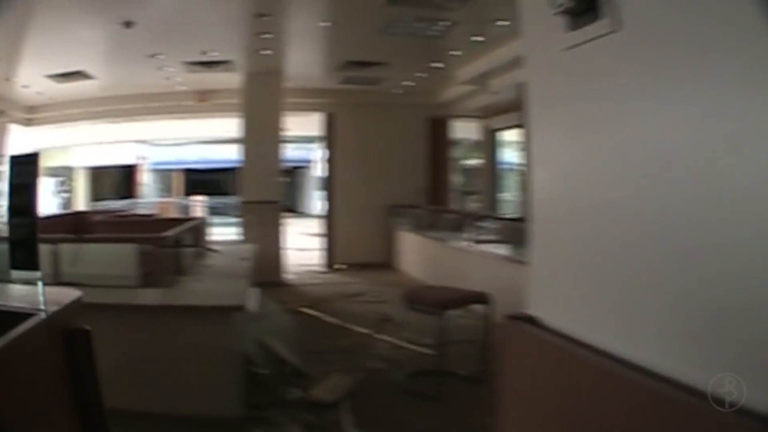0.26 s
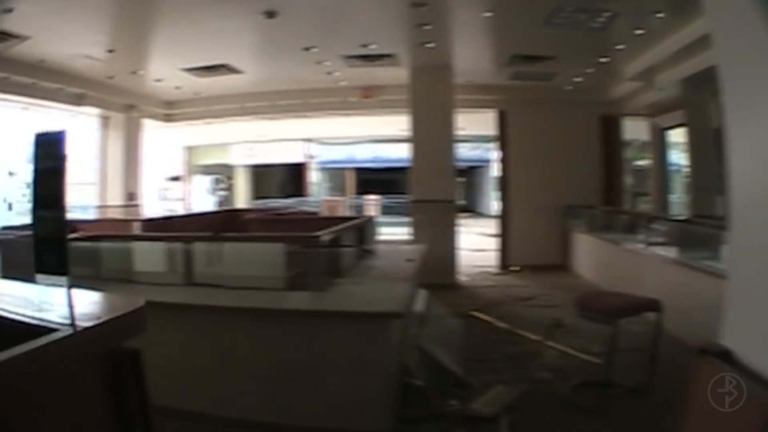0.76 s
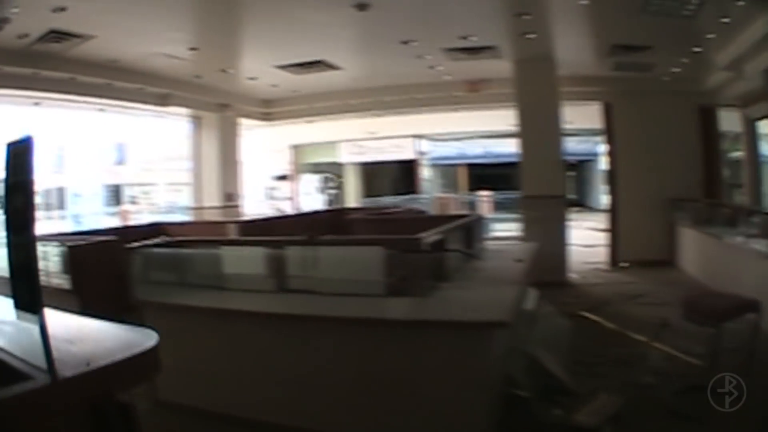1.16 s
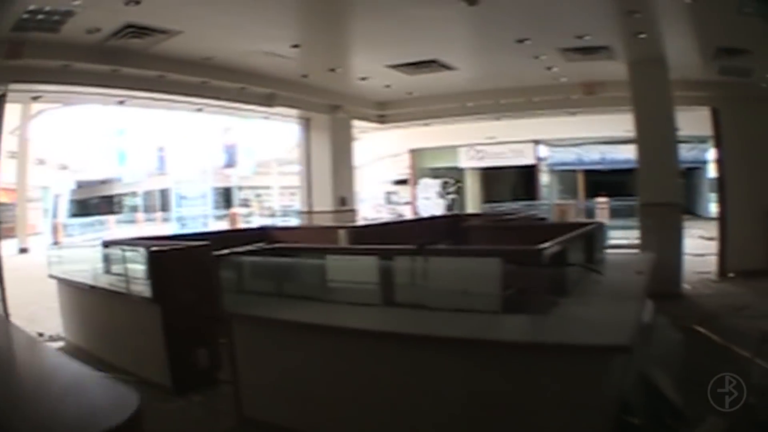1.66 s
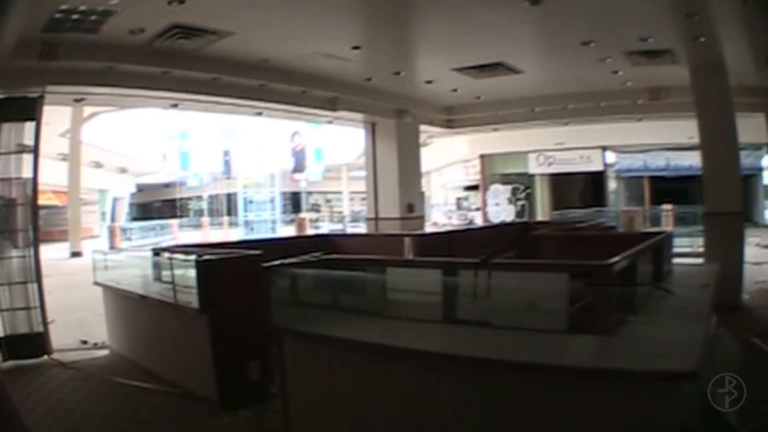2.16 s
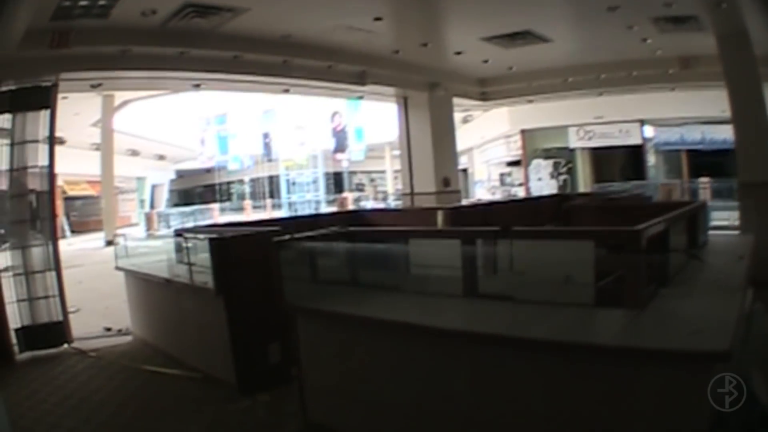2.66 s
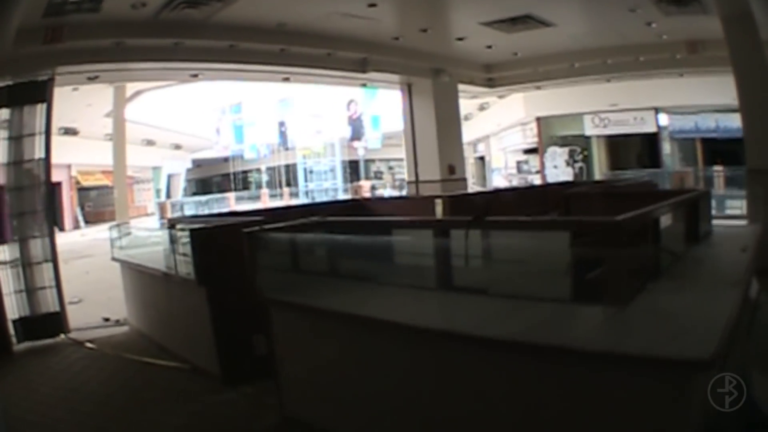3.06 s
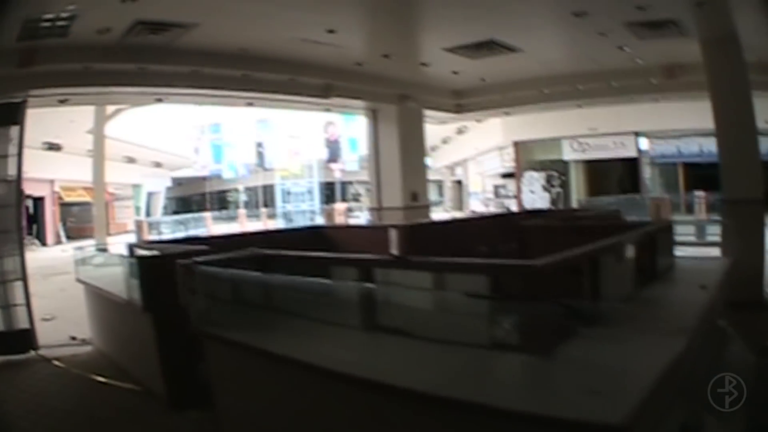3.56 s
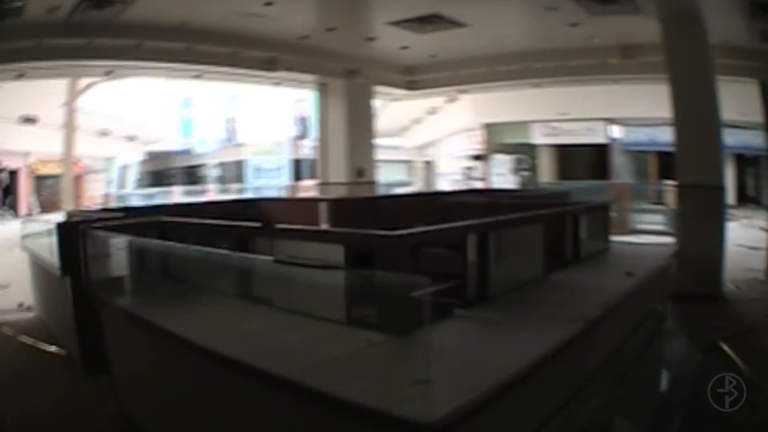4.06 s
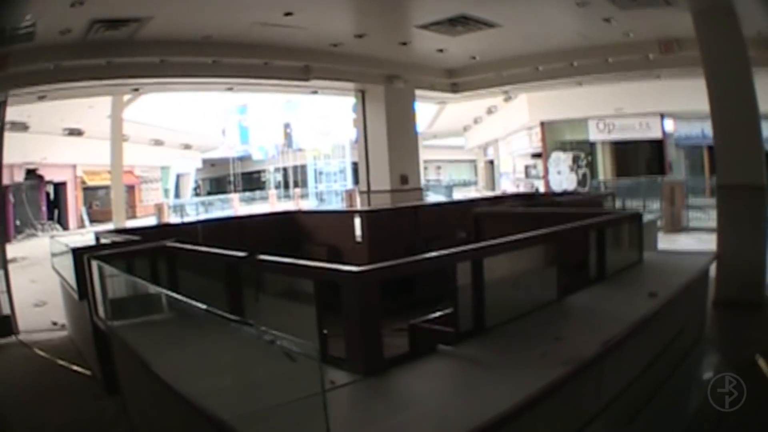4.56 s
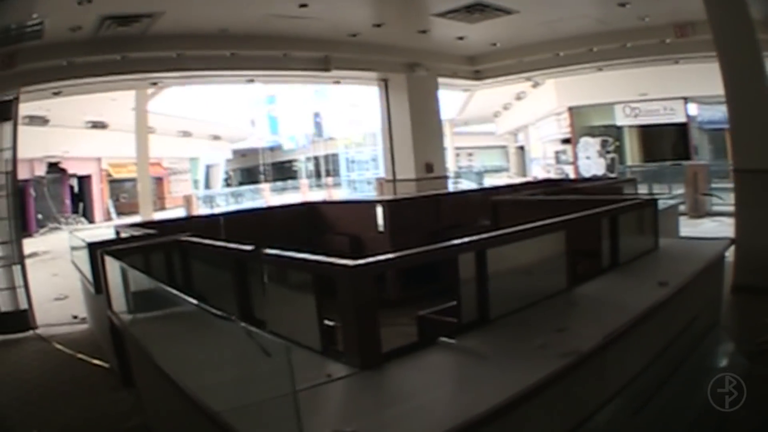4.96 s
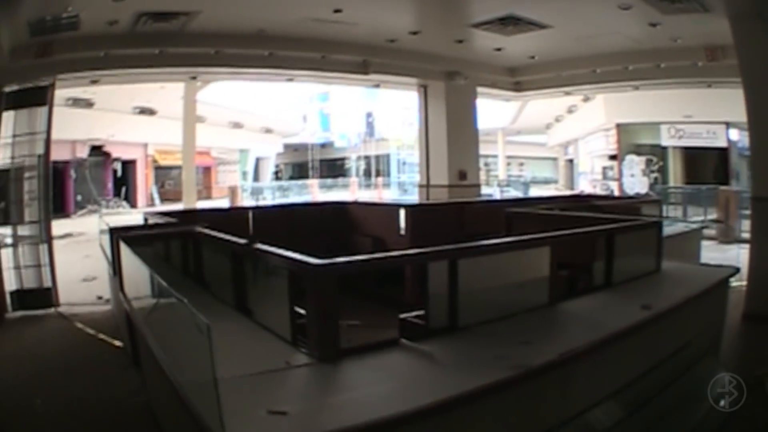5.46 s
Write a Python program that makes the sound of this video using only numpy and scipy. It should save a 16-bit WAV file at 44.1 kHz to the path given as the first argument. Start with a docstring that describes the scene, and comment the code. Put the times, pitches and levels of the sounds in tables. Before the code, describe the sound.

Close stereo sound from a camera carried by the walker: a brief glassy scrape, a dull thud, a long scatter of little clicks as weight settles on debris, a cloth swish, then the loudest moment, rapid brittle cracks and a quick clink as glass breaks underfoot. Sparse crackles trail off before a faint crunch, tiny squeak and light thuds. Quiet empty shop with a short bare reverberation.

```python
"""Slow steps over broken glass on the floor of an empty shop, heard from a hand-held camera.
A sheet cracks several times under the full weight: damped flexing, sprays of noise and ringing shards.
Before that a loose pane grates and rings as a set of swelling modes, splinters crunch and tick under
a sole as random fractures and short swings, and a leg swishes forward as filtered noise.
Two close microphone ports take the steps; the bare room answers with a decaying noise tail."""
import sys
import numpy as np
from scipy import signal
from scipy.fft import rfft, irfft, next_fast_len
from scipy.io import wavfile
from scipy.ndimage import map_coordinates

SR = 44100
rng = np.random.default_rng(int(sys.argv[2]) if len(sys.argv) > 2 else 0)


def transcribe(u):
    """Save the signal u as a 16-bit wav file named by the first command-line argument.

    u: samples, shape (n,) or (channels, n), limited to [-1, 1]; the rate is SR.
    q: integer samples, one column per channel.
    """
    v = np.clip(np.atleast_2d(u).T, -1, 1)
    q = np.round(v * 32767).astype(np.int16)
    wavfile.write(sys.argv[1], SR, q)


N = 251811

# A sole bears down on splinters. Each row: start in seconds, length in seconds, relative level in dB,
# number of the patch of floor.
PRESSES = [(1.372, 0.065, -30.5, 0), (1.447, .1, -29.5, 0), (3.963, 0.036, -31, 1), (4.02, 0.031, -16.5, 1),
           (4.086, 0.19, -29.5, 1), (4.363, 0.049, -31, 1), (5.357, 0.12, -40.5, 2)]
# Small splinters giving way. Each row: start in seconds, relative level in dB, pitch in Hz,
# treble in dB and knock on the floor in dB, both relative to the level.
SPLINTER_TICKS = [(.399, -22.5, 4360, -18, -1), (.572, -29, 3470, -20, 8), (.674, -30, 3040, -24, 6),
                  (1.51, -17, 4830, 2, -28), (1.55, -16, 1700, -19, -16), (1.61, -20, 2350, -8.5, -26),
                  (1.689, -24, 1900, -17, 1.5), (1.713, -24.5, 1780, -4, -22), (1.835, -24.5, 2680, -17, 1),
                  (1.863, -24, 1810, -20, -21), (1.902, -23.5, 5100, -9, -18),
                  (1.943, -33, 1730, -16, 10.5), (1.976, -29.5, 2070, 1.5, -4),
                  (2.009, -23, 2300, -10.5, -2), (2.127, -22, 2030, -13, -27),
                  (2.142, -27.5, 1670, -3.5, -27), (2.195, -26.5, 4560, -8.5, -29),
                  (2.318, -26.5, 1530, -9.5, -1.5), (2.338, -25.5, 3370, -20, -16),
                  (2.449, -22, 2260, -15.5, -2.5), (2.528, -19.5, 2820, -25.5, -1),
                  (2.663, -22.5, 2060, -18, 3), (3.75, -20.5, 3200, -25, -19),
                  (4.537, -20.5, 4940, -9.5, 2), (4.954, -26, 4540, 3, -33)]
# Colour of each patch of floor, one list per patch. Each row: frequency in Hz, relative density in dB.
FLOOR_COLOURS = [
    [(59, -48), (100, -12), (411, -5), (727, 4), (843, -6), (936, -4), (1880, -4), (2130, -3), (4960, 1.5),
     (7250, 0), (15500, -29)],
    [(59, -39), (100, -10), (742, -1), (2320, -3), (2630, -1), (3120, 1.5), (4660, -7), (5630, 3),
     (11100, -11), (13900, -9), (15500, -17)],
    [(59, -46), (100, -10), (340, 0), (429, -34), (697, 1), (758, -15), (3690, -7), (5510, -1.5),
     (15500, -23)],
]


def cracks(flex_db=1, spray_db=0, low_hz=220):
    """Each break flexes the sheet and throws a short spray of splinters."""
    # Each row: start in seconds, relative flex level in dB, flex pitch in Hz,
    # relative splinter level in dB, splinter decay by 60 dB in seconds.
    glass_breaks = [(4.0594, -13, 1500, -6.5, 0.015), (4.0798, -3.5, 1230, -25, 0.016),
                    (4.1452, -2, 1050, -12, 0.028), (4.1579, -9.5, 1110, -12, 0.0076),
                    (4.1932, -6, 1240, -11, 0.028), (4.208, -7, 990, -22, 0.1),
                    (4.2433, 0, 980, -13.5, 0.025), (4.2527, -5.5, 1040, -6, 0.0051),
                    (4.4428, -12.5, 1220, -29, 0.014), (4.4709, -7.5, 1130, -15, 0.0047),
                    (5.349, -13.5, 1190, -48, 0.0016), (5.3492, -5.5, 5020, -45, 0.0084)]
    body, spray = np.zeros(N), np.zeros(N)
    t = np.arange(SR // 10) / SR
    for s, db, hz, splinter_db, t60 in glass_breaks:
        add(body, s, amp(db) * flex(t, hz, cycles=0.41))
        add(spray, s, amp(splinter_db - 60 * t / t60) * rng.standard_normal(len(t)))
    # a small sheet radiates little bass
    high_pass = signal.butter(2, low_hz, "high", fs=SR, output="sos")
    body = signal.sosfilt(high_pass, body)
    return amp(flex_db) * body + amp(spray_db) * splintery(spray)


def flex(t, hz, cycles):
    """A sheet springs back in one or two heavily damped swings."""
    u = t * hz / cycles
    return -np.sin(2 * np.pi * hz * t) * u * np.exp(1 - u)


def splintery(x):
    """The colour of splintering glass, given to x."""
    # A spray of splinters. Each row: frequency in Hz, gain in dB.
    spray_colour = [(50, -1), (150, -6), (320, -7), (700, -3), (2500, 8.5), (6000, 6), (9000, 0.5),
                    (15000, -9)]
    return filtered(x, lambda hz: amp(along(spray_colour, hz)))


def clinks(jangle_db=-9, jangle_t60=1.0, drift=0.6, damp=0.0049):
    """Freed shards ring in their own few modes, set their neighbours jangling and are stopped by the sole."""
    # Three loose shards, one list each. Each row: mode in Hz, relative level in dB,
    # decay by 60 dB in seconds.
    shard_modes = [
        [(2870, -1, 1), (5600, -10.5, 0.096), (6370, 9.5, 0.045), (6370, -12, 0.77), (12600, 5, 0.034),
         (13997, 1, .04)],
        [(1130, -8, 1), (2230, -5.5, 1), (2320, -7, 0.61), (3604, 7.5, 0.18), (4380, -18, 0.46),
         (5530, -9, 0.44), (6024, -6, 0.4), (6700, -17, .3), (7300, -6, 0.99), (7750, -9, 0.28),
         (12182, -23, .25)],
        [(3970, 0.5, 0.62), (10600, -1, .15), (13800, 13, 0.017)],
    ]
    # Shards knocked. Each row: start in seconds, relative level in dB, shard number,
    # seconds until the sole damps it.
    knocked = [(4.289, -18.5, 0, 0.09), (4.306, -27, 1, 0.138), (4.623, -47, 2, 0.12)]
    # Neighbouring shards. Each row: frequency in Hz, relative density in dB.
    jangle_colour = [(1500, -19), (6500, 10.5), (10000, -1.5), (15000, -9)]
    out, shake = np.zeros(N), np.zeros(N)
    t = np.arange(SR // 2) / SR
    for s, db, shard, free in knocked:
        held = np.exp(-np.maximum(t - free, 0) / damp)
        for hz, level, t60 in shard_modes[round(shard)]:
            phase = 2 * np.pi * hz * t + drift * wobble(68)[:len(t)]
            add(out, s, amp(db + level - 60 * t / t60) * held * np.sin(phase))
        add(shake, s, amp(db + jangle_db - 60 * t / jangle_t60) * held)
    jangle = debris(grains(rate=700, spread_db=2), t60=.16)
    return out + shake * coloured(jangle, jangle_colour)


def pane(ring_db=-2.0, rasp_db=-1.0, drift=1.4, attack=0.0016):
    """Grit catches under a sliding pane and keeps its modes ringing, each swelling on its own."""
    # Modes of the pane. Each row: frequency in Hz, relative level in dB.
    pane_modes = [(805, -5), (905, -12), (1010, -10.5), (1500, -15), (1575, -7.5), (1925, -13.5),
                  (2210, -8), (2428, -2), (3055, -4), (3190, -1), (3440, -4), (3475, 1), (3738, -3.5),
                  (4386, 1), (4490, -0.5), (4796, -1.5), (5040, -23), (5395, -1), (5440, -1), (6030, -11),
                  (6350, -6), (6580, -7.5), (6880, -4.5), (7670, -7), (8270, -26), (8420, -9), (8820, -16),
                  (9250, -18), (10300, -19), (11600, -39)]
    # Colour of the grating. Each row: frequency in Hz, relative density in dB.
    rasp_colour = [(120, -57), (200, -41), (585, -19.5), (798, -9), (1260, -15.5), (1540, -14),
                   (1740, -14.5), (2470, -6), (2600, -9.5), (5490, 0.5), (15500, -27)]
    # It catches on the way. Each row: time in seconds, relative ring level in dB, relative grit level in dB.
    catch_rows = [(.066, -45, -20), (0.194, -19, -20.5), (.247, -25.5, -23), (0.301, -14, -19.5)]
    times, ring_dbs, grit_dbs = np.transpose(catch_rows)
    slide_s, slide_length_s = 0.057, 0.3

    def drive(slide_db, catch_dbs, fall):
        """Level of the steady slide and its catches, silent until the slide starts."""
        slide = amp(slide_db) * stroke(slide_s, slide_length_s, attack, fall)
        peaks = [amp(db) * spike(s, 520, fall) for s, db in zip(times, catch_dbs)]
        return together([slide] + peaks) * stroke(slide_s, 0, attack, 0)

    def mode(hz, db):
        """One mode whose level and phase wander."""
        swell_db = 6 * np.tanh(wobble(32))
        return amp(db + swell_db) * np.sin(2 * np.pi * hz * t + drift * wobble(44.87))

    ring_level = drive(-31, ring_dbs, fall=267)
    grit_level = drive(-35, grit_dbs, fall=330)
    t = np.arange(N) / SR
    ring = unit(sum(mode(hz, db) for hz, db in pane_modes))
    catches = grains(rate=7000, spread_db=4.0)
    shaken = 1.4 * debris(catches, t60=.11, count=200)
    rasp = coloured(catches + shaken, rasp_colour)
    return amp(ring_db) * ring_level * ring + amp(rasp_db) * grit_level * rasp


def crunch(patch_db=(0, -2, -1.5), glassy=0.59, clump_db=3.0):
    """Clumps of fractures while a sole bears down, in the colour of that patch of floor."""
    attack_s, fall_db_per_s = 0.014, 277
    out = np.zeros(N)
    for k, (colour, gain_db) in enumerate(zip(FLOOR_COLOURS, patch_db)):
        weight = together(amp(db) * stroke(s, length, attack_s, fall_db_per_s)
                          for s, length, db, patch in PRESSES if round(patch) == k)
        breaks = unit(grains(rate=5800, spread_db=1) * amp(clump_db * wobble(280)))
        shaken = glassy * debris(breaks, t60=0.055)
        out += amp(gain_db) * weight * coloured(breaks + shaken, colour)
    return out


def ticks(body_db=-3, snap_db=0, knock_db=-8, t60=0.019, delay=0.001271, overtone=1.46, overtone_db=-6):
    """A small splinter snaps, swings briefly in two modes and knocks on the floor."""
    # Colour of the snap. Each row: frequency in Hz, gain in dB.
    snap_colour = [(200, -19), (800, -14), (2500, 2), (6500, 4), (9000, -8), (12000, -15), (15500, -15)]
    body, snap = np.zeros(N), np.zeros(N)
    t = np.arange(SR // 30) / SR
    for s, db, hz, treble_db, floor_db in list(SPLINTER_TICKS) + faint_ticks():
        knock = amp(floor_db + knock_db) * flex(t, 644, cycles=0.43)
        swing = flex(t, hz, cycles=0.69) + amp(overtone_db) * flex(t, overtone * hz, cycles=0.83)
        add(body, s + delay, amp(db) * (amp(body_db) * swing + knock))
        add(snap, s + delay, amp(db + treble_db - 60 * t / t60) * rng.standard_normal(len(t)))
    return body + amp(snap_db) * filtered(snap, lambda hz: amp(along(snap_colour, hz)))


def faint_ticks(count=5, scatter_db=1.9, scatter_octaves=.25):
    """Fainter ticks at random while the weight rolls off a foot, as rows like those of SPLINTER_TICKS."""
    # Each row: start in seconds, length in seconds.
    foot_rolls = [(1.619, 0.21), (1.9, .22), (2.378, .4), (4.602, .65)]
    middle_db, middle_hz, treble_db, knock_db = -32, 1900, -7, -6
    rows = []
    for s, length in foot_rolls:
        times = s + length * (np.arange(count) + rng.random(count)) / count
        for at, (size, pitch) in zip(times, rng.standard_normal((count, 2))):
            db = middle_db + scatter_db * size
            hz = middle_hz * 2 ** (scatter_octaves * pitch)
            rows.append((at, db, hz, treble_db, knock_db))
    return rows


def crumbs(stirred_db=-11, tick_db=-30, rise_db_per_s=500, fall_db_per_s=300, rest_db=-66):
    """Sparse crumbs crackle after each press and around each splinter that gives way."""
    t = np.arange(SR // 50) / SR
    near_ticks = [amp(db + tick_db) * spike(s, rise_db_per_s, fall_db_per_s) for s, db, *_ in SPLINTER_TICKS]
    level = together([amp(stirred_db) * unrest(), amp(rest_db)] + near_ticks)
    crumb_grains = grains(rate=420, spread_db=6.0)
    burst = rng.standard_normal(len(t)) * amp(-60 * t / 0.015)
    crackle = signal.fftconvolve(crumb_grains, burst)[:N]
    return level * coloured(crackle, FLOOR_COLOURS[0])


def skid():
    """One splinter squeaks across the floor: noise through narrow resonances."""
    # Each row: resonance in Hz, width in Hz, relative level in dB.
    squeal_modes = [(5360, 55, 1), (5770, 99, 3), (7970, 120, 0), (8414, 120, -12), (13800, 300, -10)]
    squeak = unit(resonant(rng.standard_normal(N), squeal_modes))
    return amp(-37.5) * stroke(5.438, length=0.018, attack=0.0066, fall_db_per_s=332) * squeak


def thuds(attack=0.0032, scuff=0.69):
    """Low thuds, each a decaying tone with dull noise: heels meet the floor, and it booms under breaking glass."""
    # Low thuds: heels meeting the floor, and the floor booming under the breaking glass.
    # Each row: start in seconds, relative level in dB, pitch in Hz, decay by 60 dB in seconds.
    floor_thuds = [(.726, -23.5, 272, 0.046), (0.729, -38.5, 158, 0.13), (1.499, -38, 348, 0.16),
                   (3.966, -31, 330, .1), (4.144, -30, 278, 0.12), (4.194, -28.5, 207, 0.24),
                   (4.242, -28.5, 202, 0.14), (4.25, -39, 310, 0.042), (5.506, -26, 446, 0.023),
                   (5.604, -21.5, 290, 0.021)]
    out = np.zeros(N)
    t = np.arange(SR // 4) / SR
    for s, db, hz, t60 in floor_thuds:
        band = signal.butter(2, [hz / 2, hz * 1.6], "band", fs=SR, output="sos")
        dull = unit(signal.sosfilt(band, rng.standard_normal(len(t))))
        level = amp(db - 60 * t / t60) * (1 - np.exp(-t / attack))
        add(out, s, level * (np.sin(2 * np.pi * hz * t) + scuff * dull))
    return out


def rustle(rub_db=-2, hiss_db=-3, swish_db=-2.5, sheen_db=-7, air_db=-56, step_rub_db=-17, step_hiss_db=-13):
    """Clothes rub and swish with every step, shift and swing of a leg, over the air of the building."""
    # The walker shifts. Each row: start in seconds, length in seconds, relative rub level in dB,
    # relative hiss level in dB.
    body_shifts = [(0, 0.48, -46.5, -50), (0.65, 0.25, -49, -49), (0.906, 0.2, -49.5, -51.5),
                   (1.799, 0.29, -49.5, -67), (2.426, 1.15, -50.5, -51.5), (2.895, 0.24, -42.5, -45.5),
                   (3.172, 0.27, -44, -42), (3.695, 1, -45, -43.5), (4.388, 0.38, -46, -50.5),
                   (4.544, 1.26, -49, -49.5)]
    # A leg swings through. Each row: start in seconds, length in seconds, relative level in dB.
    leg_swings = [(2.805, .27, -43.5), (3.21, 0.54, -39)]
    # Colours of swinging cloth, its bright sheen when fast, rubbing cloth, hissing cloth and
    # the still building. Each row: frequency in Hz, relative density in dB.
    cloth_colour, sheen_colour = [(59, -43), (100, -15), (319, -6), (508, -8), (541, -4.5), (697, -12.5),
                                  (898, -7), (4190, -6.5), (6120, -9.5), (15500, -60)], [(3000, -39), (6000, 2.5), (8000, -3.5), (11500, -14),
                                                 (15500, -17)]
    rub_colour, hiss_colour, air_colour = [(80, -16), (200, -1.5), (320, 2.5), (600, 2.5), (1000, -1),
                                           (2000, -12), (5000, -44)], [(400, -14.5), (1000, -3.5), (2000, 4), (4000, 0.5),
                                                        (6500, -3.5), (9000, -13), (12000, -21),
                                                        (15500, -23)], [(12, -32), (20, 4.5), (213, 3.5),
                                                                      (362, -2.5), (649, -2), (906, -7.5),
                                                                      (1920, -6), (2150, -14), (3540, -9),
                                                                      (6910, -20), (14300, -28),
                                                                      (15500, -41)]
    rest_rub_db, rest_hiss_db = -55.5, -54.5  # clothes are never quite still
    stirred = unrest()
    moves = [(arch(s, length, shape=0.43), low_db, high_db) for s, length, low_db, high_db in body_shifts]
    rub = together([amp(rest_rub_db), amp(step_rub_db) * stirred] + [amp(db) * move for move, db, _ in moves])
    hiss = together([amp(rest_hiss_db), amp(step_hiss_db) * stirred] + [amp(db) * move for move, _, db in moves])
    speed = sum(amp(db) * arch(s, length, shape=.8) for s, length, db in leg_swings)
    # the faster the cloth slides, the brighter it gets
    sheen = amp(sheen_db) * speed / speed.max() * diffuse(sheen_colour)
    swish = speed * (amp(swish_db) * diffuse(cloth_colour) + sheen)
    rubbing = amp(rub_db) * rub * diffuse(rub_colour)
    hissing = amp(hiss_db) * hiss * diffuse(hiss_colour)
    return rubbing + hissing + swish + amp(air_db) * diffuse(air_colour)


def room(x, near_db=7, near_t60=0.22):
    """Counters close by answer densely, then the bare shop dies away."""
    # Each row: frequency in Hz, decay by 60 dB in seconds.
    shop_decay = [(150, 0.2), (900, 0.47), (3000, 0.54), (7000, 0.39), (15000, 0.17)]
    # Width of the room's answer. Each row: frequency in Hz, side over mid in dB.
    answer_width = [(70, -7), (200, -10), (600, -17), (1200, -11), (2200, -4), (5000, -6), (9000, 0),
                    (15000, 11)]
    hz, t, z = signal.stft(rng.standard_normal((2, SR)), SR, nperseg=256)
    fade = amp(-60 * t / along(shop_decay, hz)[:, None]) + amp(near_db - 60 * t / near_t60)
    tail = signal.istft(z * fade, SR, nperseg=256)[1]
    tail = tail / np.linalg.norm(tail[0])
    late = np.pad(x, (SR // 500, 0))  # 2 ms before the answer starts
    mid, side = signal.fftconvolve(late[None], tail, axes=1)[:, :N]
    side = filtered(side, lambda hz: amp(along(answer_width, hz)))
    return np.array([mid + side, mid - side])


def ports(x, lean=0.29, scatter=0.68, width_db=0):
    """Two close microphone ports: sides out of step by random phases, drawn anew for each group of sounds."""
    # Each row: frequency in Hz, side over mid in dB before width_db is added.
    port_width = [(100, -58), (1000, -68), (2500, -11.5), (5000, -5.5), (7000, -4.5), (9500, 6.5),
                  (12500, 9.5), (15500, -5)]
    knots = np.linspace(0, SR / 2, 60)
    turn = np.pi / 2 + lean + scatter * rng.standard_normal(len(knots))
    side = filtered(x, lambda hz: amp(width_db + along(port_width, hz)) * np.exp(1j * np.interp(hz, knots, turn)))
    return np.array([x + side, x - side])


def diffuse(spectrum):
    """Stereo noise arriving from all sides."""
    # Each row: frequency in Hz, side over mid in dB.
    diffuse_width = [(30, -11), (70, 5), (200, 2.5), (600, -4.5), (1200, -3.5), (2200, -5), (5000, -8),
                     (9000, 2), (15000, 5)]
    mid, side = (coloured(rng.standard_normal(N), spectrum) for _ in range(2))
    side = filtered(side, lambda hz: amp(along(diffuse_width, hz)))
    return np.array([mid + side, mid - side])


def unrest():
    """How much the presses of the sole still stir debris and clothes, which come to rest slowly."""
    attack_s, settle_db_per_s = 0.029, 55
    return together(amp(db) * stroke(s, length, attack_s, settle_db_per_s) for s, length, db, _ in PRESSES)


def grains(rate, spread_db):
    """Irregular tiny fractures, rate of them a second, a few much larger than the rest."""
    count = int(rate * N / SR)
    size_db = spread_db * np.minimum(rng.exponential(size=count), 4)
    size = amp(size_db) * rng.choice([-1, 1], count)
    return unit(np.bincount(rng.integers(0, N, count), size, N))


def debris(x, t60, count=120):
    """x shakes a heap of shards, each with a mode of its own."""
    t = np.arange(SR // 4) / SR
    hz = rng.uniform(1500, 15000, (count, 1))
    size_db = rng.uniform(-6, 6, (count, 1))
    heap = np.sum(np.sin(2 * np.pi * hz * t) * amp(size_db - 60 * t / t60), axis=0)
    return unit(signal.fftconvolve(x, heap)[:N])


def stroke(s, length, attack, fall_db_per_s):
    """Gain that opens at s, holds and then dies away."""
    t = np.arange(N) / SR - s
    return (1 - np.exp(-np.maximum(t, 0) / attack)) * amp(-fall_db_per_s * np.maximum(t - length, 0))


def spike(s, rise_db_per_s, fall_db_per_s):
    """Gain that builds up to a peak at s and dies away."""
    t = np.arange(N) / SR - s
    return amp(np.maximum(np.minimum(rise_db_per_s * t, -fall_db_per_s * t), -200))


def arch(s, length, shape):
    """Speed of a movement that starts and ends at rest."""
    u = np.clip((np.arange(N) / SR - s) / length, 0, 1)
    return np.abs(np.sin(np.pi * u)) ** shape


def wobble(rate):
    """A smooth random curve, rate knots a second."""
    knots = rng.standard_normal(int(N * rate / SR) + 4)
    coarse = np.arange(0, N + 64, 64)
    return np.interp(np.arange(N), coarse, map_coordinates(knots, [coarse * rate / SR]))


def together(levels):
    """Unrelated sounds add in power."""
    return np.sqrt(sum(g ** 2 for g in levels))


def amp(db):
    """Decibels to gain."""
    return 10 ** (np.asarray(db) / 20)


def unit(x):
    """Scale to rms 1."""
    return x / np.sqrt(np.mean(x ** 2) + 1e-20)


def along(points, hz):
    """(Hz, value) points read at hz on a log axis."""
    f, v = np.transpose(points)
    return np.interp(np.log(hz + 1), np.log(f + 1), v)


def filtered(x, response):
    """x times a complex response of frequency."""
    m = next_fast_len(N + SR // 2)
    return irfft(rfft(x, m) * response(np.fft.rfftfreq(m, 1 / SR)), m)[..., :N]


def coloured(x, spectrum):
    """x filtered by the given spectrum, at rms 1."""
    return unit(filtered(x, lambda hz: amp(along(spectrum, hz))))


def resonant(x, modes):
    """x ringing through (Hz, width in Hz, dB) resonances."""
    def response(f):
        return sum(amp(db) * 1j * f * w / (c * c - f * f + 1j * f * w) for c, w, db in modes)
    return filtered(x, response)


def add(track, s, sound):
    """Mix a sound in at time s."""
    part = track[round(s * SR):][:len(sound)]
    part += sound[:len(part)]


def scene():
    """The steps reach the two ports directly and through the room, over clothes and air."""
    breaks = cracks() + thuds()
    snaps = ticks()
    dragged = pane()
    ground = crunch() + crumbs() + skid() + clinks()
    direct = ports(breaks, width_db=-2.5) + ports(snaps, width_db=-3.5)
    direct = direct + ports(dragged, width_db=-2.5) + ports(ground, width_db=-3.5)
    answer = amp(-10) * room(breaks + amp(1.5) * snaps) + amp(-13) * room(dragged + ground)
    return direct + answer + rustle()


def record(dry):
    """Peaks beyond full scale are clipped; nothing is kept from 15.9 kHz up."""
    return filtered(np.clip(dry, -1, 1), lambda hz: hz < 15900)


dry = scene()
out = record(dry)
transcribe(out)
```